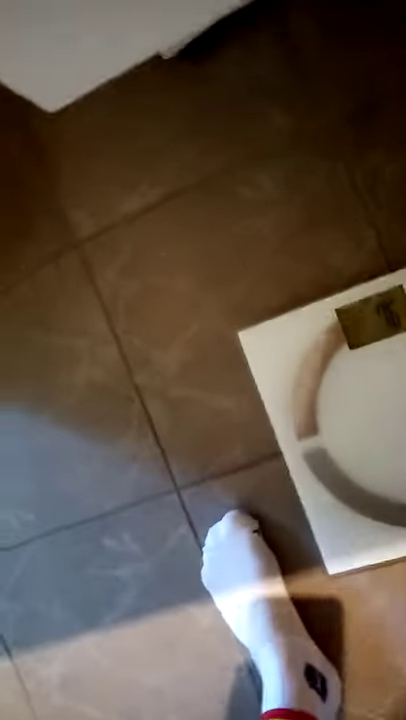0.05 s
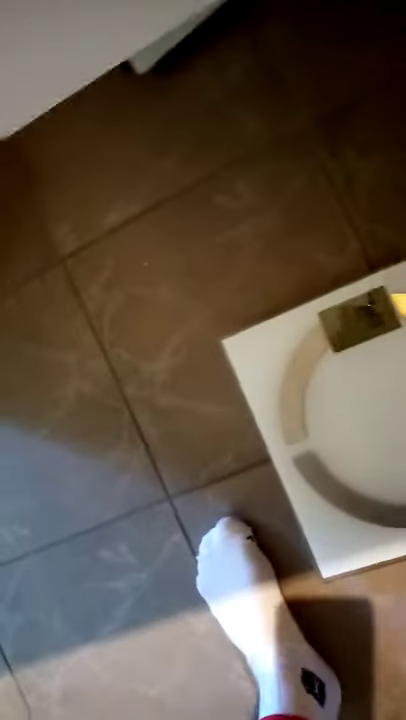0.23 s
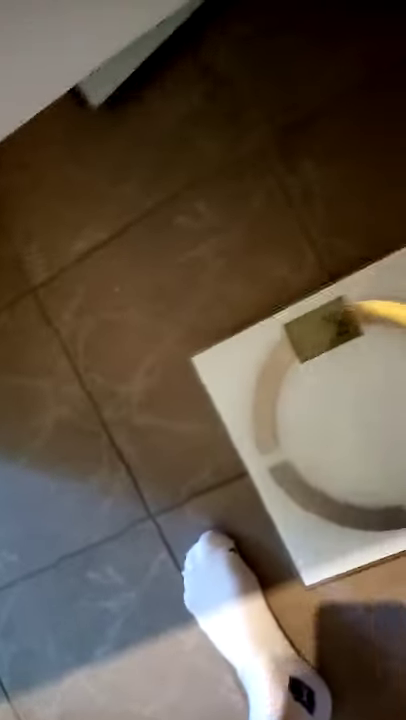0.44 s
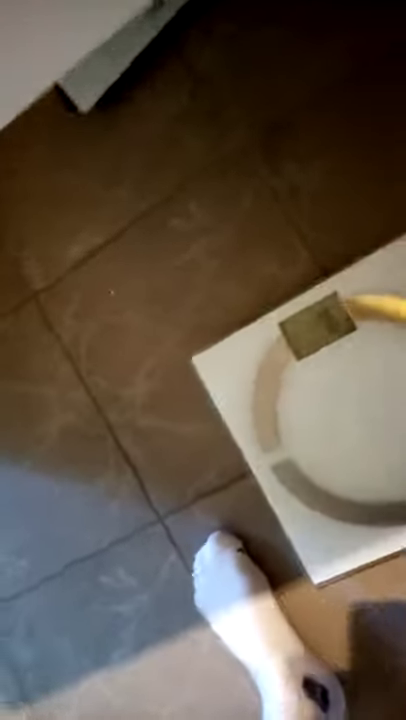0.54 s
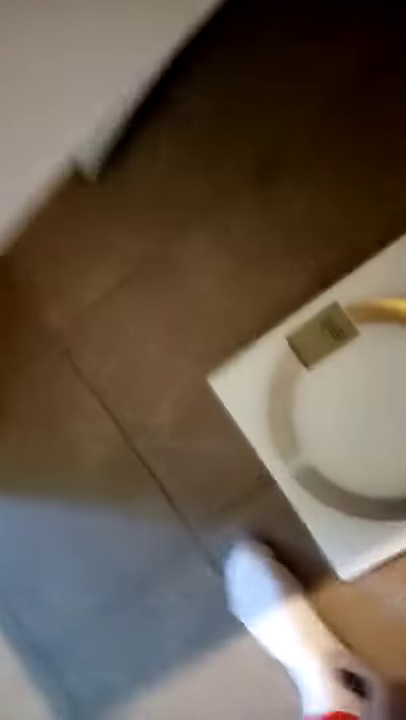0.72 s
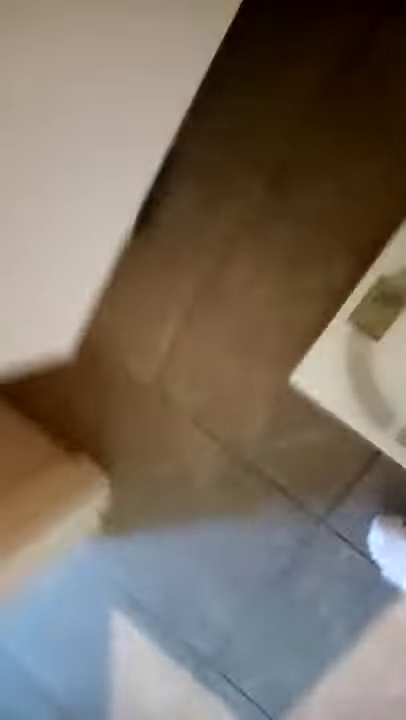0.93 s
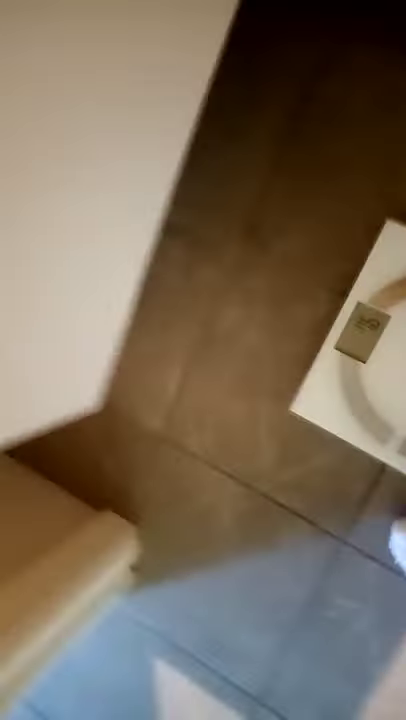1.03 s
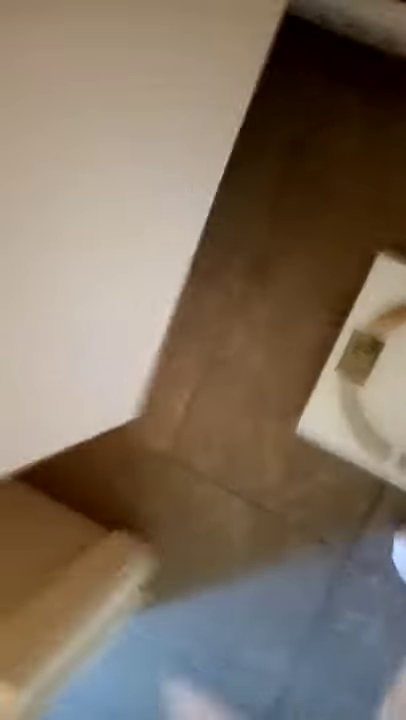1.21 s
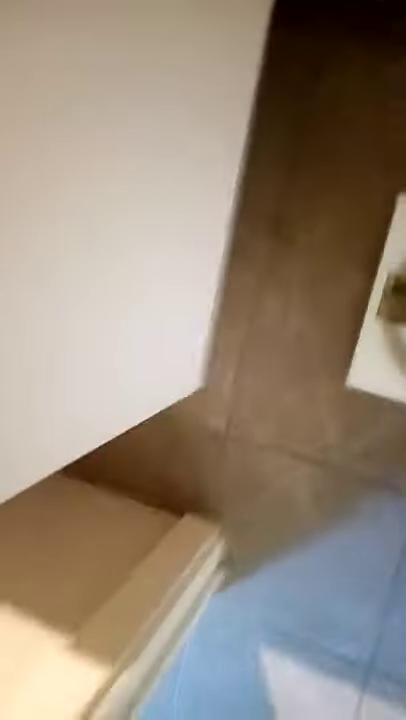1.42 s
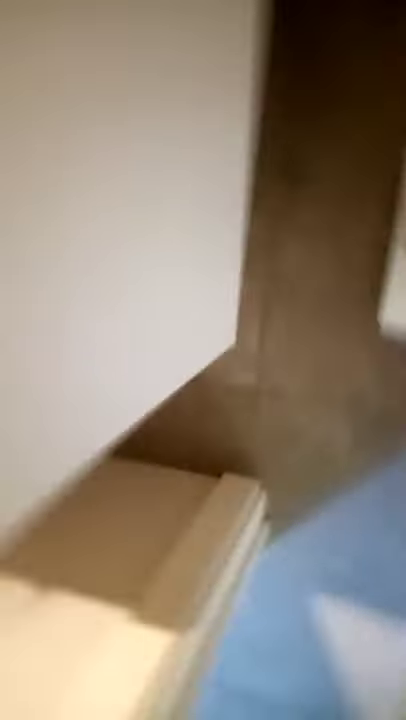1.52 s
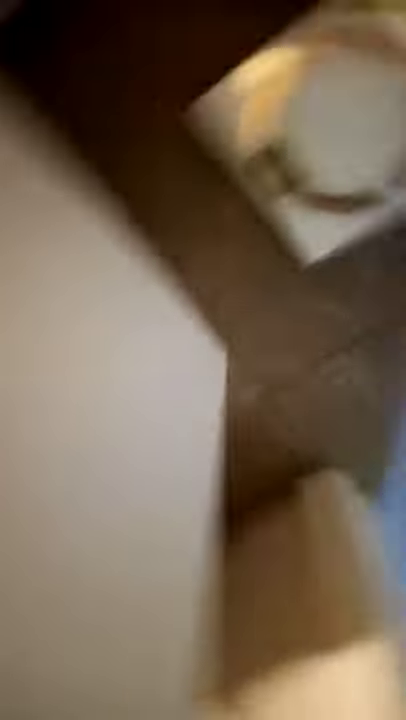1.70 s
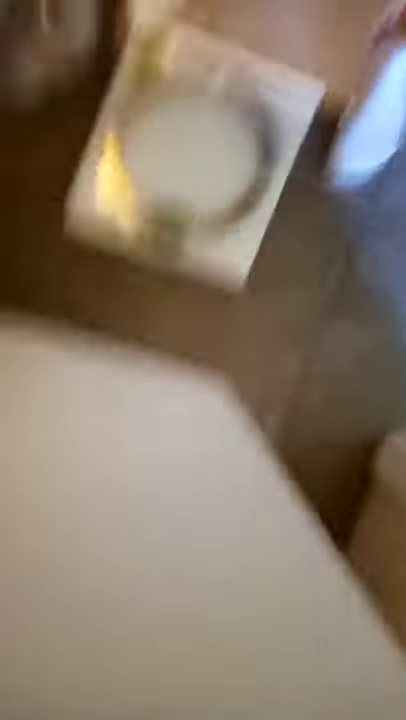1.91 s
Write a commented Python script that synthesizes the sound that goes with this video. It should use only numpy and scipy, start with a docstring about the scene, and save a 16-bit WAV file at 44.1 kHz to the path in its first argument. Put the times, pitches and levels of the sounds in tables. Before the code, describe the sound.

A bathroom scale is shoved over the tiles of a small, ringing room, with rattling clunks, low thuds, scraping and brief squeaks. Then dull rubs, ticks and a rustle sound close to the microphone.

```python
"""A bathroom scale, shoved by a foot over the tiles of a small, ringing room, clunks, scrapes and squeaks.
Rattling knocks ring its plate and case, and its weight lands in low thuds. As it slides, its feet slip,
rasp and whistle while the plate groans. Then the hand holding the camera shifts its grip: dull rubs
and bumps, small ticks and a rustle close to the microphones. A thin friction whistle, perhaps a door
hinge, and a faint hiss lie beneath."""
import sys
import numpy as np
from scipy import signal
from scipy.fft import rfft, irfft
from scipy.io import wavfile
from scipy.ndimage import uniform_filter1d

SR = 44100
rng = np.random.default_rng(int(sys.argv[2]) if len(sys.argv) > 2 else 0)


def wav_record(signal):
    """Record a signal, one row per channel, as 16-bit PCM in the file named by sys.argv[1]."""
    frames = np.transpose(np.atleast_2d(signal))
    bounded = np.clip(frames, -1, 1)
    # unit amplitude maps onto the largest positive 16-bit level
    quanta = np.round(bounded * 32767).astype(np.int16)
    wavfile.write(sys.argv[1], SR, quanta)


N = 85995
LEAD = 4410  # samples of pre-roll, so a knock can ring in from before time zero
TIME = np.arange(-LEAD, N) / SR
FREQS = np.fft.rfftfreq(4096, 1 / SR)

# Quiet background bed: (frequency [Hz], level [dB])
HISS_COLOUR = [(25, -19), (80, 2.5), (250, -9.5), (2000, -21), (7000, -19), (11000, -34.5), (15500, -28.5)]
# Decay of the tiled room: (frequency [Hz], t60 [s])
ROOM_T60 = [(80, 0.34), (200, 0.39), (330, 0.41), (700, 0.57), (5000, 0.33), (8000, 0.33), (15000, 0.18)]
# Tone of the shaded, dull left microphone: (frequency [Hz], gain [dB])
LEFT_MIC_EQ = [(100, -5), (400, -1.5), (1500, -3), (4000, -5), (6600, -5.5), (7400, -25.5), (8200, -21),
               (10000, -18.5), (15000, -32)]

# A finger rubs by the left microphone: (time [s], level [dB])
RUB_ENVELOPE = [(.935, -64), (.965, -36), (1.005, -36.5), (1.048, -33), (1.062, -49.5), (1.16, -60),
                (1.29, -82)]
# Its muffled tone: (frequency [Hz], level [dB])
RUB_COLOUR = [(25, -37.5), (60, -9), (110, 5.5), (230, -8.5), (400, -17), (700, -49.5), (2000, -70)]
# The grip bumps the camera: (time [s], level [dB], pitch [Hz], half length [s], right over left [dB])
BUMPS = [(1.124, -40.5, 127, 0.013, -43), (1.177, -42.5, 110, 0.0054, -40), (1.207, -48, 85.6, 0.016, -20),
         (1.459, -38.5, 106.5, 0.0077, 25), (1.591, -43.5, 102, 0.0031, 36),
         (1.683, -50.5, 99.5, 0.0088, 30)]
# A grainy rustle close by: (time [s], level [dB])
RUSTLE_ENVELOPE = [(.9, -56.5), (.95, -49), (1.0, -60), (1.22, -71), (1.33, -67), (1.395, -73.5),
                   (1.435, -53.5), (1.5, -48.5), (1.56, -53.5), (1.612, -52.5), (1.66, -66), (1.75, -82.5),
                   (1.83, -77), (1.9, -67), (1.95, -73)]
# The rustle's crisp tone: (frequency [Hz], level [dB])
RUSTLE_COLOUR = [(200, 7.5), (600, -10.5), (1400, 0.5), (2600, 8.5), (4500, 6.5), (6500, 11), (9000, -0.5),
                 (12500, -10), (15200, 6)]
# A thin friction whistle, perhaps a door hinge: (time [s], level [dB])
WHISTLE_ENVELOPE = [(1.19, -81.5), (1.25, -73), (1.34, -72), (1.375, -92.5), (1.41, -63), (1.45, -90)]
# Its narrow band: (frequency [Hz], level [dB])
WHISTLE_COLOUR = [(1000, -36.5), (2000, -13.5), (2400, -4), (2650, -8.5), (3100, -49.5)]
# Ticks and taps of the grip:
# (time [s], level [dB], pitch [Hz], half width [octaves], right over left [dB], broadband share [dB])
TICKS = [(0.968, -18, 5100, 0.74, 9, -9.5), (1.032, -16.5, 5100, 0.59, 2, -38),
         (1.0575, -10.5, 5550, 0.52, 46, -48), (1.067, -9.5, 5740, 0.34, 3, -46),
         (1.406, -34, 2480, .2, 13, -18), (1.4432, -7, 2650, 0.29, 27, -15.5),
         (1.4526, -18, 5200, 0.33, 18, -2), (1.452, 1, 211, 0.42, -1, -34), (1.589, -25, 400, 1, 31, -6),
         (1.612, -17.5, 6330, 0.33, 4.5, -13.5), (1.8033, -20, 706, 0.44, 19, -26)]

# The sliding plate groans: (time [s], level [dB])
GROAN_ENVELOPE = [(.24, -36), (.28, -46.5), (.36, -50.5), (.46, -52.5), (.54, -53.5), (.68, -54), (.8, -62),
                  (.93, -57), (1.08, -54), (1.2, -81), (1.3, -97)]
# The groan's dark tone: (frequency [Hz], level [dB])
GROAN_COLOUR = [(40, -40.5), (70, -9.5), (150, 1), (240, 7), (320, 2), (500, -6), (610, -4.5), (1000, -12),
                (2000, -31)]
# The scale's weight lands: (time [s], level [dB], contact time [s])
THUDS = [(.127, -42.5, 0.00032), (0.25, -40.5, 0.0013), (0.276, -35, 0.0017), (.512, -46.5, 0.0051),
         (0.788, -56.5, .002)]
# Low notes of plate and floor that a landing wakes: (frequency [Hz], level [dB], t60 [s])
THUD_MODES = [(77.1, -16, 0.23), (120.7, 1, 0.12), (157.8, -3, 0.19), (234.5, -2, 0.3), (317.3, -8, 0.43),
              (382.8, -0.5, 0.25), (648.7, -7.5, 0.46), (806, -4, .22), (938, -6.5, 0.27),
              (1191, -2.5, 0.14)]
# The scale's feet squeak: (time [s], length [s], pitch [Hz], level [dB], pitch jitter [0-1])
SQUEAKS = [(0.3334, 0.011, 8145, -15, 0.02), (.707, 0.028, 8405, -35, 0.04),
           (0.722, 0.012, 4475, -31, 0.09), (0.789, 0.0062, 4120, -37, 0.05),
           (0.804, 0.0153, 4303, -35.5, 0.08), (0.806, 0.015, 7950, -34, 0.07),
           (0.82, 0.024, 9350, -49.5, 0)]
# Body tone that plate and case radiate: (frequency [Hz], level [dB])
CASE_COLOUR = [(30, -40), (70, -31.5), (140, -16.5), (260, -8), (500, -12.5), (800, -8), (1080, -14),
               (1430, -8), (1700, -7), (2400, -6.5), (3250, -6.5), (3550, -7), (3850, -3), (6700, 1),
               (8200, -7), (9800, -15.5), (13000, -22.5), (15300, -10)]
# The feet scrape along the floor; a faint late swell is the ticks' ring in the room:
# (time [s], level [dB])
SCRAPE_AND_TICK_TAIL = [(.24, -63), (.30, -43), (.365, -26), (.39, -47.5), (.50, -39), (.55, -56),
                        (.60, -27.5), (.61, -37), (.626, -21.5), (.655, -33), (.695, -35.5), (.76, -43.5),
                        (.85, -45.5), (.96, -88), (1.05, -49), (1.2, -72)]
# The feet judder and rasp as the slide slows: (time [s], level [dB])
RASP_ENVELOPE = [(.61, -56), (.632, -30.5), (.675, -33), (.72, -39)]
# The scale's modes, which ring after a blow: (frequency [Hz], level [dB], t60 [s])
RING_MODES = [(795, -27.5, 0.2), (1310, -4.5, 0.052), (2444, -14, 0.021), (1444, -6.5, 0.0674),
              (5300, -30.5, .04), (6950, -18.5, 0.036)]
# The scale knocks on the tiles:
# (time [s], level [dB], bass [dB], treble [dB], direct over room send [dB], rattle [s])
KNOCKS = [(-.02, 0, 2, -6.5, -20, 0.0031), (0.1138, -2.5, 2, -8.5, 1, 0.0087),
          (.125, -5, 12, -19, 3.5, 0.019), (.2392, 9.5, -6, 2.5, -2.5, 0.013),
          (.254, -3, 11, 15.5, -1, 0.011), (0.276, -3, 3, 16.5, 1, 0.012), (0.2854, 7, 3, 2, -3, 0.0033),
          (0.313, 2, -18, -2, 6.5, 0.019), (0.448, -3.5, 9, 2, -4, 0.00015),
          (0.4673, -9, -28, -2, 9.5, 0.0015), (0.47, 5.5, -4.5, 1.5, 1, 0.0012),
          (0.5557, 0, 5.5, 9, -2.5, 0.0099), (0.5955, 5.5, -15, 8.5, -9.5, 0.0085),
          (0.7932, -5.5, -3, 7, -8, 0.0013), (.811, -26, -2, 17, 5.5, 0.014),
          (1.802, -18, 17, -15.5, -4.5, 0.0014), (1.9033, -33, -2, -13.5, 10.5, 0.0012)]


def amp(db):
    return 10 ** (np.asarray(db) / 20)


def unit(x):
    """Scales to rms 1."""
    return x / np.sqrt(np.mean(x ** 2) + 1e-20)


def curve_at(points, hz=FREQS):
    """Reads a curve on a log-frequency axis."""
    freqs, values = np.transpose(points)
    return np.interp(np.log(hz + 1), np.log(freqs + 1), values)


def envelope(points):
    """Gain along a level curve, silent outside it."""
    return amp(np.interp(TIME, *np.transpose(points), left=-140, right=-140))


def pan(right_db):
    """Left and right gains; the nearer side stays at 1."""
    return amp(np.minimum([[-right_db], [right_db]], 0))


def add(mix, start_s, sound):
    """Drops a sound onto the timeline."""
    part = mix[..., max(round(start_s * SR) + LEAD, 0):][..., :sound.shape[-1]]
    part += sound[..., :part.shape[-1]]


def equalise(x, gain_db):
    """Minimum-phase EQ with the given gain at FREQS."""
    cepstrum = np.fft.irfft(np.log(amp(gain_db)))
    half = len(cepstrum) // 2
    cepstrum[1:half] *= 2
    cepstrum[half + 1:] = 0
    impulse = np.fft.irfft(np.exp(np.fft.rfft(cepstrum)))
    return signal.fftconvolve(x, impulse)[:len(x)]


def noise(colour):
    """Coloured noise of rms 1."""
    return unit(equalise(rng.standard_normal(len(TIME)), curve_at(colour)))


def burst(decay_s):
    """A dying flurry of tiny contacts with an even spectrum, energy 1."""
    t = np.arange(4096) / SR
    fade = np.exp(-t / decay_s)
    phases = np.angle(rfft(rng.standard_normal(len(t)) * fade))
    flurry = irfft(np.exp(1j * phases)) * fade ** .25
    return flurry / np.linalg.norm(flurry)


def hiss():
    """A faint, wide bed: separate noise on each side."""
    return amp(-76.5) * np.array([noise(HISS_COLOUR), noise(HISS_COLOUR)])


def room(x, wet_db=-5, build_s=0.013, mono_below_hz=526):
    """Dense reflections off tiled walls, alike at both microphones in the bass."""
    t = np.arange(SR) / SR
    hz, frame_s, spectra = signal.stft(rng.standard_normal((2, SR)), SR, nperseg=512)
    alike = np.exp(-(hz[:, None] / mono_below_hz) ** 2)
    spectra[0] = alike * spectra[1] + np.sqrt(1 - alike ** 2) * spectra[0]
    decay = amp(-60 * frame_s / curve_at(ROOM_T60, hz)[:, None])
    tail = signal.istft(spectra * decay, SR)[1][:, :SR]
    tail *= 1 - np.exp(-t / build_s)
    tail /= np.linalg.norm(tail[1])
    return amp(wet_db) * signal.fftconvolve(x[None], tail, axes=1)[:, :len(x)]


def shifting_room(x, swaps_per_s=2.5):
    """Scale and camera move, so the reflections shift: the send swings between two reverbs and back."""
    turn = np.pi * swaps_per_s * TIME
    return room(x * np.cos(turn)) + room(x * np.sin(turn))


def early_reflections(x, bounce_db=4):
    """The straight path plus quick bounces off floor and cabinet, different at each microphone."""
    bounces = np.array([signal.fftconvolve(x, burst(decay_s=0.0066))[:len(x)] for _ in range(2)])
    return (x + amp(bounce_db) * bounces) / np.hypot(1, amp(bounce_db))


def left_microphone(x, ahead_s=.00095):
    """The shaded left side sounds duller and hears everything slightly earlier."""
    return np.interp(TIME + ahead_s, TIME, equalise(x, curve_at(LEFT_MIC_EQ)))


def grip_rub_and_bumps():
    """Dull rubbing and soft bumps carried through the camera's body."""
    out = noise(RUB_COLOUR) * envelope(RUB_ENVELOPE) * pan(-58)
    for time_s, db, hz, half_length_s, right_db in BUMPS:
        t = TIME - time_s
        swell = np.exp(-(t / half_length_s) ** 2)
        out += pan(right_db) * amp(db) * swell * np.sin(-2 * np.pi * hz * t)
    return out


def rustle_and_whistle(grain_db=2.25):
    """A grainy rustle close by on the right, and a thin friction whistle, perhaps a door hinge."""
    flicker = unit(uniform_filter1d(rng.standard_normal(len(TIME)), size=120))
    rustle = noise(RUSTLE_COLOUR) * envelope(RUSTLE_ENVELOPE)
    whistle = noise(WHISTLE_COLOUR) * envelope(WHISTLE_ENVELOPE)
    return (rustle + whistle) * amp(grain_db * flicker) * pan(13)


def grip_ticks():
    """Tiny taps of the grip, each a snap of noise focused in one band."""
    out = np.zeros((2, len(TIME)))
    for start_s, db, hz, width_oct, right_db, broad_db in TICKS:
        band = 1 / (1 + (np.log2((FREQS + 1) / hz) / width_oct) ** 6)
        tick = equalise(burst(decay_s=.002), 20 * np.log10(band + amp(broad_db)))
        add(out, start_s, pan(right_db) * amp(db) * tick)
    return out


def groan(direct_db=-15.5):
    """Low shudder of the sliding plate, as (direct, room send)."""
    return noise(GROAN_COLOUR) * envelope(GROAN_ENVELOPE) * amp([[direct_db], [0]])


def thuds(attack_s=0.0068):
    """The scale's weight drops onto the tiles; a softer contact wakes fewer of the higher notes."""
    t = np.arange(SR) / SR
    out = np.zeros(len(TIME))
    for start_s, db, contact_s in THUDS:
        notes = np.zeros(len(t))
        for hz, mode_db, t60 in THUD_MODES:
            decay = amp(mode_db - 60 * t / t60)
            softening = np.hypot(1, 2 * hz * contact_s)
            notes += decay / softening * np.sin(2 * np.pi * (hz * t + rng.random()))
        add(out, start_s, amp(db) * np.minimum(t / attack_s, 1) * notes)
    return out


def squeaks(sag=0.081, send_db=-12):
    """Short stick-slip whistles with an unsteady, sagging pitch, as (direct, room send)."""
    out = np.zeros(len(TIME))
    for start_s, length_s, hz, db, jitter in SQUEAKS:
        progress = np.arange(0, 1, 1 / (length_s * SR))
        wobble = unit(uniform_filter1d(rng.standard_normal(SR // 8), size=24))[:len(progress)]
        pitch_hz = hz * (1 - sag * (progress - .5) + jitter * wobble)
        swell = np.sqrt(abs(np.sin(np.pi * progress)))
        add(out, start_s, amp(db) * swell * np.sin(2 * np.pi * np.cumsum(pitch_hz) / SR))
    return out * amp([[0], [send_db]])


def case_tone(force, bass_db, treble_db):
    """Plate and case radiate a contact force, tilted deeper for heavy hits and brighter for sharp ones."""
    tilt = [(280, bass_db), (2050, 0), (5710, 0.52 * treble_db), (10700, treble_db)]
    return equalise(force, curve_at(CASE_COLOUR) + curve_at(tilt))


def slips(per_s):
    """Feet catching and letting go: randomly timed clicks, rms 1."""
    return unit((rng.random(len(TIME)) < per_s / SR) * rng.choice([-1, 1], len(TIME)))


def scrape(direct_db=2):
    """Fine slips shake the case and coarser ones rasp as the slide slows, as (direct, room send)."""
    # The fine layer's faint late swell stands for the ticks' ring in the room
    fine = case_tone(slips(per_s=2200) * envelope(SCRAPE_AND_TICK_TAIL), bass_db=-12.5, treble_db=4)
    coarse = case_tone(slips(per_s=460) * envelope(RASP_ENVELOPE), bass_db=1.5, treble_db=1.5)
    return amp([[direct_db], [0]]) * (fine + coarse)


def ring(hit, blow_db, ring_db=-6, full_ring_above_db=15):
    """Adds the ringing modes of plate and case; light touches hardly wake them."""
    t = np.arange(len(hit)) / SR
    modes = np.zeros(len(t))
    for hz, db, t60 in RING_MODES:
        equal_energy = np.sqrt(4 * np.log(1000) / (t60 * SR))
        modes += equal_energy * amp(db - 60 * t / t60) * np.cos(2 * np.pi * hz * t)
    drive = amp(ring_db + min(blow_db - full_ring_above_db, 0))
    return hit + drive * signal.fftconvolve(hit, modes)[:len(hit)]


def knocks():
    """The scale clatters on the tiles, each rattling blow ringing its body, as (direct, room send)."""
    out = np.zeros((2, len(TIME)))
    for start_s, db, bass_db, treble_db, direct_db, rattle_s in KNOCKS:
        force = np.pad(burst(rattle_s), (0, SR // 4))  # space to ring out
        clunk = ring(case_tone(force, bass_db, treble_db), db)
        add(out, start_s, amp([[db + direct_db], [db]]) * clunk)
    return out


def scene(near_send_db=-21):
    """The stereo mix: the scale a little to the right in its room, the grip up close, hiss beneath."""
    direct, send = knocks() + scrape() + squeaks() + groan()
    near = rustle_and_whistle() + grip_ticks()
    scale = early_reflections(direct) * pan(3.6) + thuds()
    reverb = shifting_room(send + amp(near_send_db) * near[1])
    left, right = scale + reverb + near
    airborne = np.array([left_microphone(left), right])
    return (airborne + grip_rub_and_bumps() + hiss())[:, LEAD:]


def record(dry, cutoff_hz=15780):
    """A steep low-pass trims the very top."""
    lowpass = signal.firwin(301, cutoff_hz, window=("kaiser", 8), fs=SR)
    return signal.oaconvolve(dry, lowpass[None], "same")


dry = scene()
out = record(dry)
wav_record(out)
```